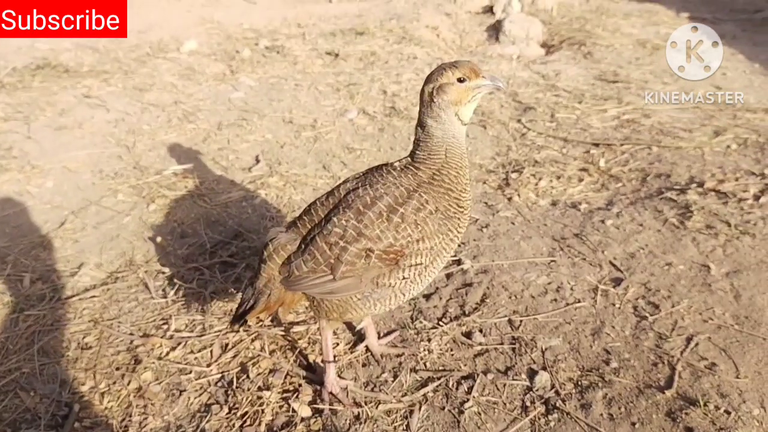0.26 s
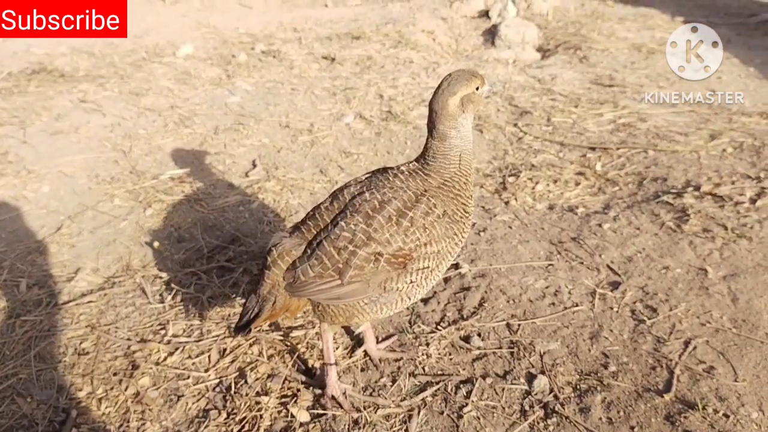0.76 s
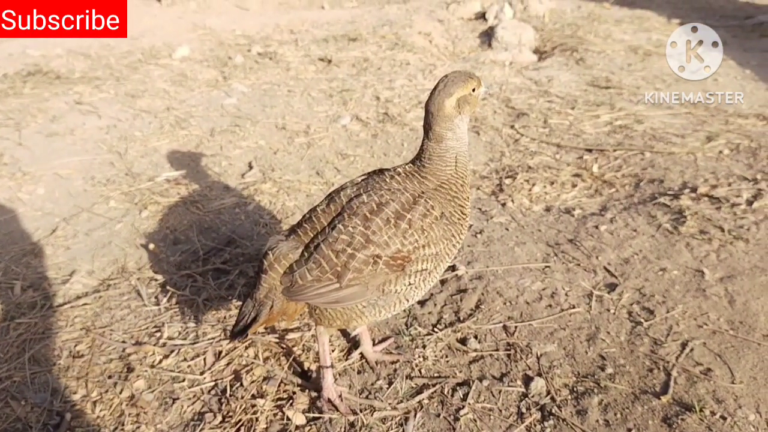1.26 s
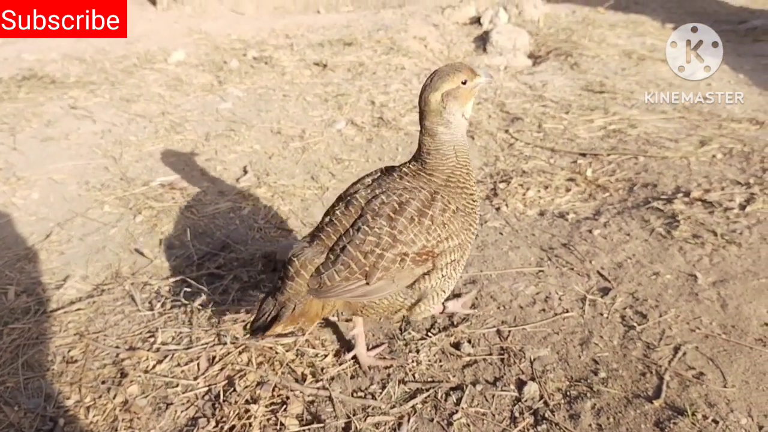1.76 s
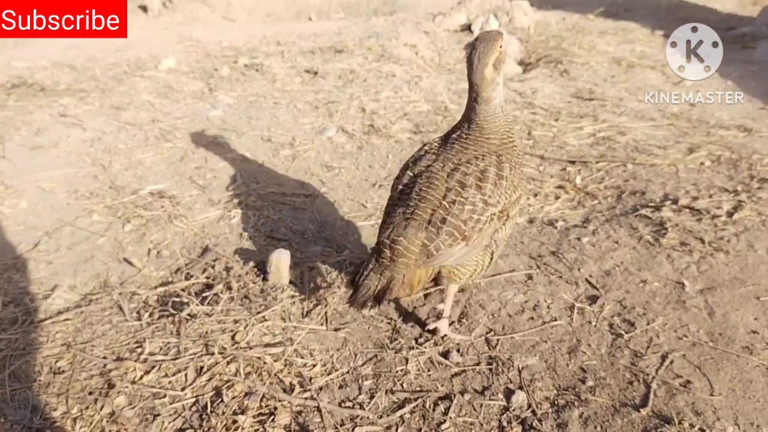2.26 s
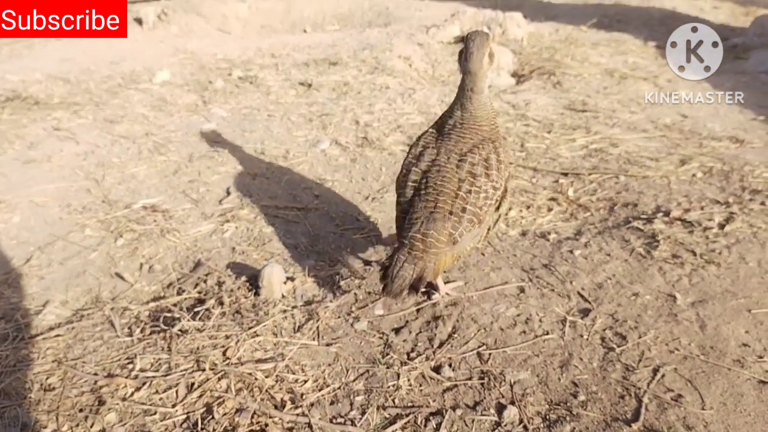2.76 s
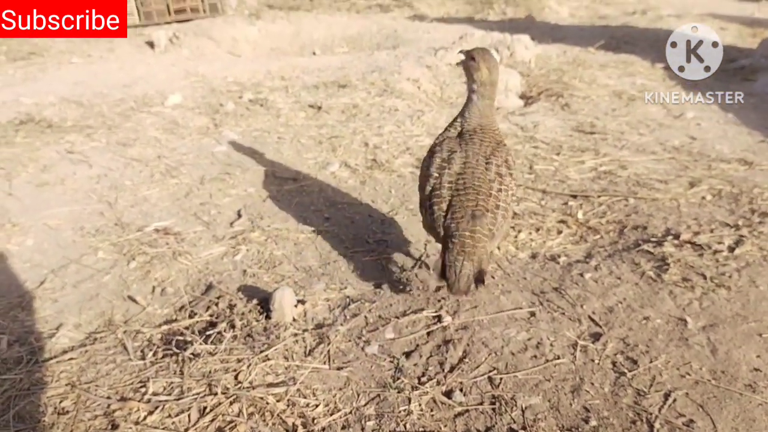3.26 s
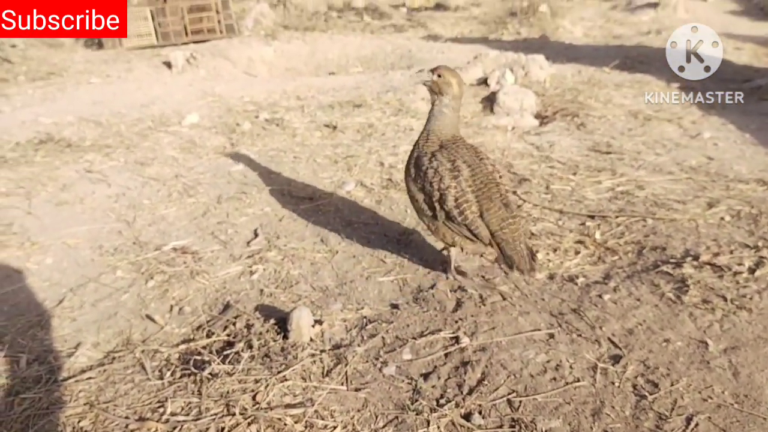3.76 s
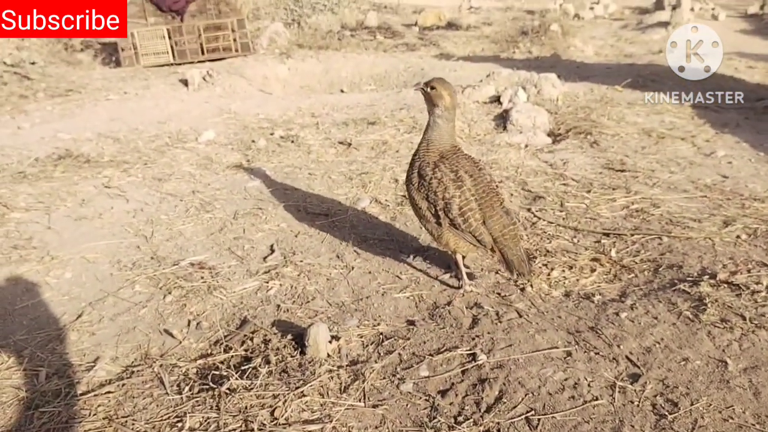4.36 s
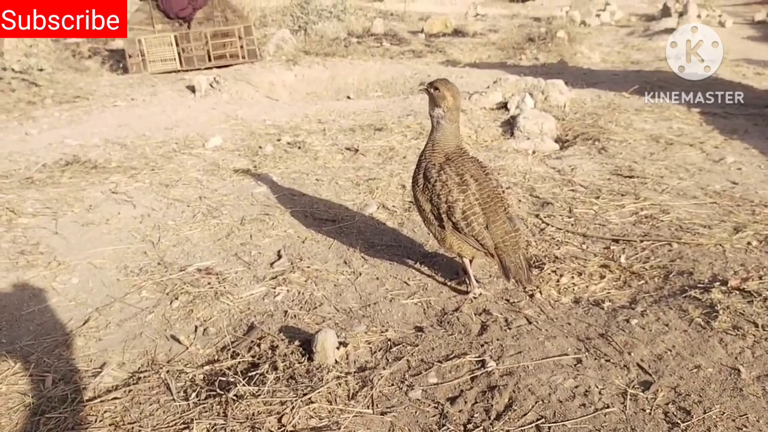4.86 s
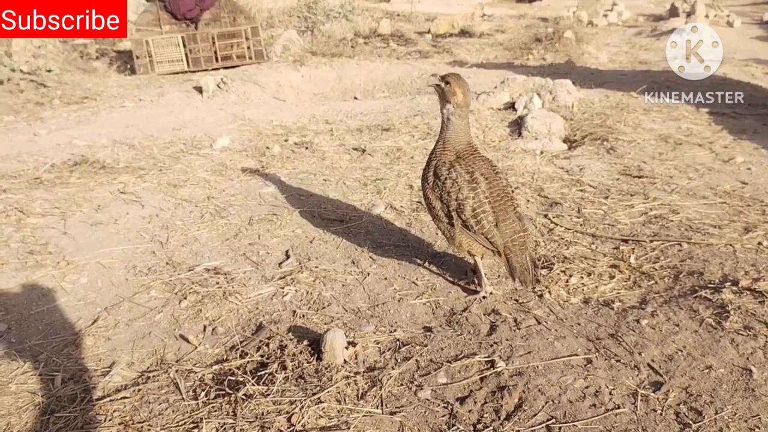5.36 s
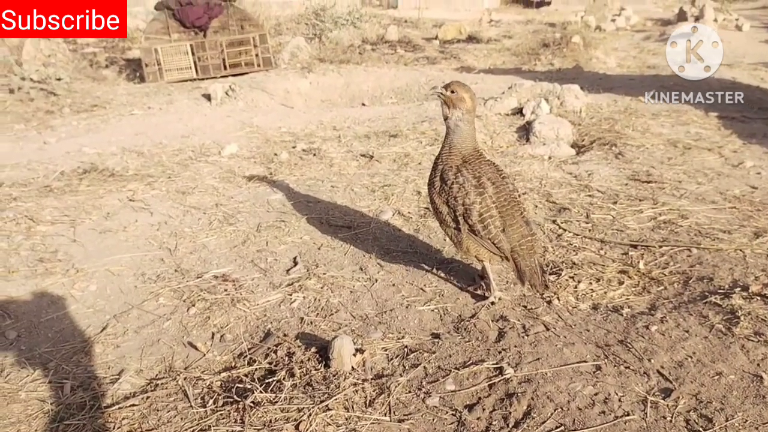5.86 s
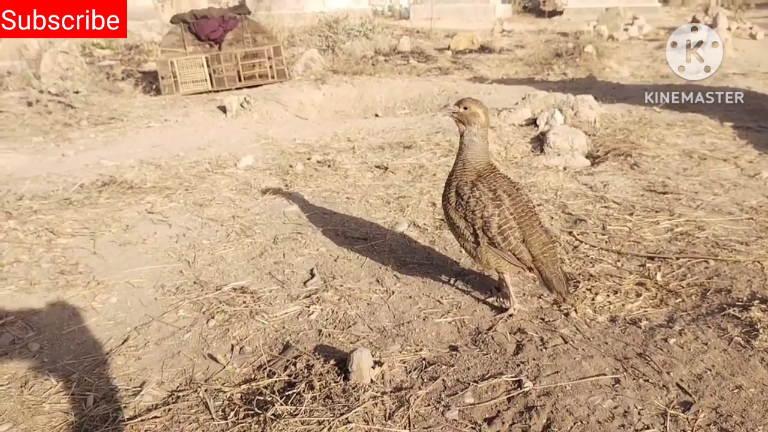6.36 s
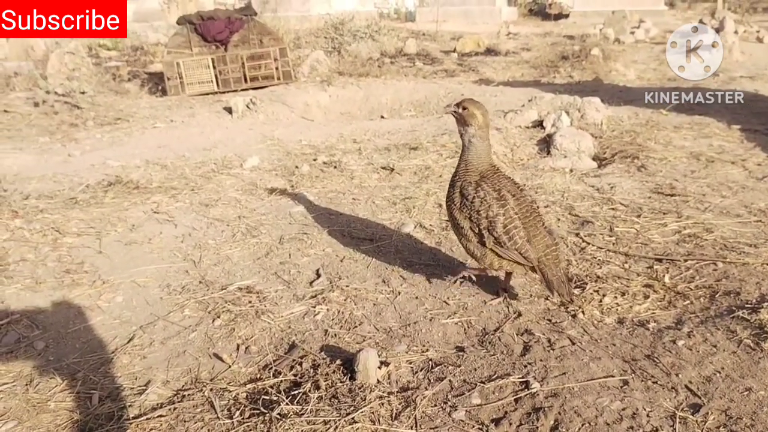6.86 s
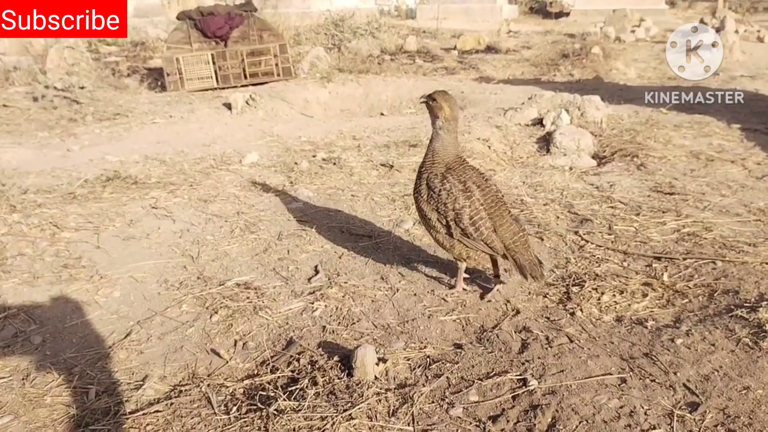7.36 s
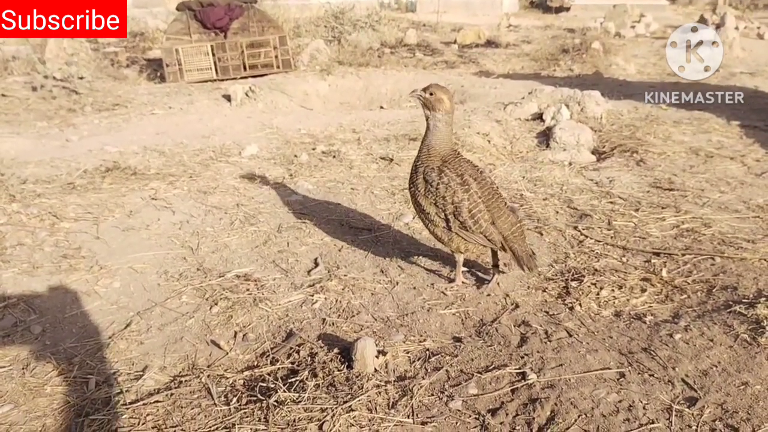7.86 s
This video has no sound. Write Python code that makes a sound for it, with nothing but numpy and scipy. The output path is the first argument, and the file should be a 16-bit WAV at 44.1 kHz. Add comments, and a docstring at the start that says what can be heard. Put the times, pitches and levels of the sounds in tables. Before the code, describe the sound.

At 0 s a nearby grey francolin lets out one abrupt raspy bark, falling in pitch and gone in under a tenth of a second. Until 1.7 s there is only soft low rumble, with tiny thin chirps around 0.3 to 0.9 s and blurred far-off bird calls. At 1.7 s the bird starts again and from 1.9 s settles into a loud, urgent run: rasping barks that often crack to a higher register, brief piercing whistles, and sharp falling slurs, repeating roughly every 0.6 s. From about 5 s the cycle stretches toward 0.7 s, pitch sags and slurs rattle more at their ends. The last whistle comes near 7.1 s, the last slur about 7.65 s, leaving low rumble and slight hiss to 8 s. The calls are dry and close, with rippling treble and a thin scattered echo; the background ducks beneath them.

```python
"""Dry open ground: a grey francolin repeats a harsh phrase in which barks and falling slurs mostly alternate.
Chaotic pulses ring throat and beak as a rasp, then harmonic tones lock in; some jump to a high register
and some notes lead into held whistles. The ground ripples the treble; rough walls return a smeared tail.
Behind: low rumble and a brighter hiss of filtered noise, faint sine chirps and noise-band calls of far birds.
Gain control pushes this background down while the francolin calls."""
import sys
import numpy as np
from scipy import signal
from scipy.fft import rfft, irfft, next_fast_len
from scipy.io import wavfile
from scipy.ndimage import uniform_filter1d, map_coordinates

SR = 44100
rng = np.random.default_rng(int(sys.argv[2]) if len(sys.argv) > 2 else 0)


def generate_wav(signal):
    """Clip the signal to [-1, 1] and save it as 16-bit WAV at the path in sys.argv[1]."""
    frames = np.transpose(np.atleast_2d(signal))
    scaled = np.clip(frames, -1, 1) * 32767
    pcm = np.round(scaled).astype(np.int16)
    wavfile.write(sys.argv[1], SR, pcm)


N = 357298
TIME = np.arange(N) / SR
CUTOFF_HZ = 15500


def from_db(db):
    """Decibels to amplitude gain."""
    return 10 ** (np.asarray(db) / 20)


def rms_one(x):
    """Scale to unit power."""
    return x / np.sqrt(np.mean(x ** 2) + 1e-20)


def evened(x, size=500):
    """Hold the power steady over a window of size samples, about 10 ms."""
    return x / np.sqrt(uniform_filter1d(x ** 2, size) + 1e-12)


def at_hz(points, hz, axis=1):
    """Read one column of a spectrum table on a log-frequency axis."""
    points = np.array(points)
    return np.interp(np.log(np.maximum(hz, 1)), np.log(points[:, 0]), points[:, axis])


def wander(size, rate_hz):
    """Gaussian values at rate_hz, joined by straight lines."""
    steps = np.arange(size) * rate_hz / SR
    return map_coordinates(rng.standard_normal(size), [steps], order=1, mode="wrap")


def band(x, low_hz, high_hz, order=2):
    """Butterworth band-pass."""
    edges = [low_hz, min(high_hz, .49 * SR)]
    return signal.sosfilt(signal.butter(order, edges, "band", fs=SR, output="sos"), x)


def resonate(x, modes):
    """Parallel two-pole resonances with alternating signs."""
    out = 0
    for k, (hz, width_hz, db) in enumerate(modes):
        r = np.exp(-np.pi * width_hz / SR)
        gain = (-1) ** k * from_db(db) * (1 - r * r) / 2
        poles = [1, -2 * r * np.cos(2 * np.pi * hz / SR), r * r]
        out = out + gain * signal.lfilter([1, 0, -1], poles, x)
    return out


def stretch(start, end, edge_s):
    """Samples of a note, its progress 0-1, and a gate with soft edges."""
    at = np.arange(max(0, int((start - edge_s) * SR)), min(N, int((end + edge_s) * SR)))
    inside = np.minimum(TIME[at] - start, end - TIME[at])
    progress = np.clip((TIME[at] - start) / (end - start), 0, 1)
    gate = .5 + .5 * np.sin(np.pi / 2 * np.clip(inside / edge_s, -1, 1))
    return at, progress, gate


def arch(pitches, progress):
    """A smooth polynomial pitch glide through evenly spaced points."""
    spots = np.linspace(0, 1, len(pitches))
    return np.polyval(np.polyfit(spots, pitches, len(pitches) - 1), progress)


# left-right likeness of the background noise: f/Hz, likeness/1 (below 0 counts as 0)
LIKENESS = [(60, 0.95), (180, 0.95), (550, 0.71), (1650, -0.45), (4970, -0.067), (15000, 0.13)]


def background_noise(spectrum):
    """Stereo noise of unit power: a shared mid and an opposed side, nearly alike in the bass."""
    size = next_fast_len(N, True)
    hz = np.fft.rfftfreq(size, 1 / SR)
    mid, side = rfft(rng.standard_normal((2, size))) * from_db(at_hz(spectrum, hz))
    alike = np.clip(at_hz(LIKENESS, hz), 0, 1)
    return rms_one(irfft(np.sqrt(1 + alike) * mid + np.sqrt(1 - alike) * side * [[1], [-1]])[:, :N])


# steady spectral shapes of the rumble and the brighter hiss: f/Hz, relative density/dB
RUMBLE_SPECTRUM = [(25, -28), (42, -26.5), (65, -9), (125, 1), (200, -5.5), (300, -12), (450, -29),
                   (700, -35), (1100, -41), (2000, -40.5), (3000, -46.5), (6200, -57.5), (10000, -62.5),
                   (15000, -78.5)]
BRIGHT_SPECTRUM = [(100, -21.5), (230, -11.5), (450, -3.5), (700, -7.5), (1000, -19.5), (1500, -29),
                   (1950, -16), (2700, -31.5), (5300, -38), (6300, -23), (7100, -40.5), (9000, -41.5),
                   (12000, -52)]
# mean background levels before gain control: t/s, rumble level/dB, bright hiss level/dB
BACKGROUND_LEVELS = [(0, -37, -80.5), (1.1, -39, -72), (1.702, -39, -58), (2.3, -40.5, -46.5),
                     (3.5, -35.5, -44.5), (4.5, -38, -45), (5.7, -41, -49), (6.3, -38.5, -43.5),
                     (8.1, -38, -50)]


def rumble_and_hiss(lump_db=1.37, bright_lump_db=2.5):
    """A lumpy low rumble, and a brighter hiss with low-mid body whose level rises, then varies."""
    s, rumble_db, bright_db = np.transpose(BACKGROUND_LEVELS)
    rumble_level_db = np.interp(TIME, s, rumble_db) + lump_db * wander(N, 8.1)
    bright_level_db = np.interp(TIME, s, bright_db) + bright_lump_db * wander(N, 2.648)
    low = background_noise(RUMBLE_SPECTRUM) * from_db(rumble_level_db)
    return low + background_noise(BRIGHT_SPECTRUM) * from_db(bright_level_db)


# far chirps before gain control: start t/s, end t/s, start f/Hz, middle f/Hz, end f/Hz, peak level/dB
CHIRPS = [(.26, .31, 3500, 3900, 4400, -77), (.34, .39, 4750, 4400, 3900, -75),
          (.67, .74, 4400, 5200, 4750, -74), (.88, .93, 4200, 4600, 4300, -79)]
# distance-blurred calls before gain control: start t/s, end t/s, centre f/Hz, level/dB
FAR_CALLS = [(0.282, 0.587, 1940, -66), (6.06, 6.155, 2900, -53), (1.0, 1.276, 1800, -66),
             (1.392, 1.583, 2400, -63.5), (6.744, 6.86, 1900, -51.5), (7.779, 8.055, 1930, -68)]


def small_birds(blur=0.15):
    """Thin gliding sine chirps, and farther calls that arrive as soft noise bands."""
    out = np.zeros((2, N))
    for start, end, *pitches, db in CHIRPS:
        at, progress, gate = stretch(start, end, .012)
        hz = arch(pitches, progress) * (1 + 0.012 * wander(len(at), 640))
        out[:, at] += from_db(db) * gate * np.sin(2 * np.pi * np.cumsum(hz) / SR)
    for start, end, hz, db in FAR_CALLS:
        at, _, gate = stretch(start, end, 0.089)
        call = band(rng.standard_normal((2, len(at))), hz * (1 - blur), hz * (1 + blur))
        out[:, at] += from_db(db) * gate * rms_one(call)
    return out


def background_gain(bird, threshold_db=-35, share=1.0, release_db_per_s=140, depth_db=20):
    """Gain control: the louder the bird, the further the background sinks; it recovers in the pauses."""
    power = uniform_filter1d(np.mean(bird ** 2, axis=0), size=256)
    level_db = 10 * np.log10(np.abs(power) + 1e-12)
    release_db = release_db_per_s * TIME
    held_db = np.maximum.accumulate(level_db + release_db) - release_db
    return from_db(-np.clip(share * (held_db - threshold_db), 0, depth_db))


def yard(voice, far_db=-25, far_t60_s=0.35, wall_s=0.067, spread_s=0.041, wall_db=-25):
    """A thin decaying tail from the surroundings and a bright, smeared return from rough walls."""
    t = TIME[:SR // 2]
    far, wall = rng.standard_normal((2, 2, len(t)))
    far = band(far * from_db(-60 * t / far_t60_s), 1600, 7000, order=1)
    wall = band(wall * np.exp(-.5 * ((t - wall_s) / spread_s) ** 2), 2000, 7200, order=4)
    wall = wall + from_db(5.5) * resonate(wall, [(2218, 95, 0)])
    response = (from_db(far_db) * rms_one(far) + from_db(wall_db) * rms_one(wall)) / np.sqrt(len(t))
    return signal.fftconvolve(voice[None], response, axes=1)[:, :N]


def ground(voice, bounce_db=-10, shift_s=0.00019, count=3):
    """Bounces off the ground ripple the treble; their paths shift as the bird and the microphone move."""
    treble = band(voice, 2600, 15000, order=2)
    out = np.zeros((2, N))
    for side in out:
        for delay_s in rng.uniform(.0005, .003, count):
            path_s = delay_s + shift_s * wander(N, 1.5)
            side += from_db(bounce_db) * np.interp(TIME - path_s, TIME, treble, left=0)
    return out


# voice at two microphone ports, before power levelling: f/Hz, left-right level/dB, left lead/rad
PORTS = [(780, -1.5, 0.73), (1342, 0.1, -0.59), (1590, -5, -0.82), (1850, 0.5, -1.9), (2350, -7.5, 2.2),
         (2500, 3.5, -0.22), (3380, 7, 1.5), (3985, 6, -0.31), (4700, 7.5, -0.58), (5300, 2.5, 1.8),
         (6800, 2, 1.6), (9500, -0.5, 1.3), (10500, 14, -0.29), (14000, 8, 0)]


def at_ports(voice):
    """The microphone body colours each side differently, in level and phase."""
    size = next_fast_len(N, True)
    hz = np.fft.rfftfreq(size, 1 / SR)
    side = np.array([[.5], [-.5]])
    gains = from_db(side * at_hz(PORTS, hz))
    gains = gains / np.sqrt(np.mean(gains ** 2, axis=0))
    turn = np.exp(1j * side * at_hz(PORTS, hz, axis=2))
    return irfft(rfft(voice, size) * gains * turn)[:, :N]


def chaos(pulse_hz, scatter, size_db, air):
    """The membranes slap at uneven intervals with uneven force, and air hisses through."""
    cycles = np.cumsum(pulse_hz * np.exp(scatter * wander(N, 800))) / SR
    slaps = np.diff(np.floor(cycles), prepend=0) * from_db(size_db * rng.standard_normal(N))
    return rms_one(slaps) + air * rng.standard_normal(N)


# rasp resonances before levelling: f/Hz, width/Hz, relative level/dB
THROAT = [(868.5, 49, -5.5), (1246, 224, 2.5), (1609, 536, 2)]
BEAK = [(2353, 73, 5.5), (3260, 540, -3.5), (4795, 530, 0.5), (7460, 950, -13.5), (8400, 1300, -21.5),
        (9660, 1200, -23.5), (11600, 1000, -33)]


def rasps(stretches, throat_db=0.0, beak_db=3.0, beak_lag_s=0.0027):
    """Chaotic pulses ring the throat and beak before a tone locks in and after it lets go."""
    pulses = chaos(pulse_hz=800, scatter=.17, size_db=4.0, air=.08)
    throat = evened(band(resonate(pulses, THROAT), 770, 1950, order=4), size=360)
    beak = evened(band(resonate(pulses, BEAK), 2350, 14500, order=4), size=360)
    beak = rms_one(band(beak, 1000, 4530, order=4) + from_db(-11.0) * beak)
    out = np.zeros(N)
    for start, end, low_db, high_db, slope_db in stretches:
        at, progress, gate = stretch(start, end, .002)
        # treble follows as the beak opens
        opening = 1 - np.exp(-np.maximum(TIME[at] - start + 0.00061, 0) / beak_lag_s)
        ringing = from_db(low_db + throat_db) * throat[at]
        ringing = ringing + from_db(high_db + beak_db) * opening * beak[at]
        out[at] += gate * from_db(slope_db * (progress - 1.11)) * ringing
    return out


def tones(notes, overtones, jitter, shimmer_db, flutter_db, edge_s, fray=0.015, count=10):
    """The syrinx locked on one pitch: a nearly steady oscillation whose upper harmonics flutter."""
    out = np.zeros(N)
    for start, end, pitches, levels, second_db in notes:
        at, progress, gate = stretch(start, end, edge_s)
        # least stable as it locks in and lets go
        unrest = 1 + 2 * (2 * progress - 1) ** 4
        # a slack syrinx, sagging in pitch, starts to rattle
        unrest += np.clip((1250 - arch(pitches, progress)) / 60, 0, 3)
        hz = arch(pitches, progress) * (1 + jitter * unrest * wander(len(at), 900))
        phase = 2 * np.pi * np.cumsum(hz) / SR
        wave = np.sin(phase) + from_db(second_db) * np.sin(2 * phase + rng.uniform(0, 2 * np.pi))
        for k in range(3, count + 1):
            db = at_hz(overtones, k * hz) + flutter_db * min(k / 6, 1) * wander(len(at), 110)
            # upper harmonics follow a strong second only in part
            db += second_db - 0.26 * max(second_db + 6.0, 0)
            smear = fray * k * wander(len(at), 1400)
            harmonic = np.sin(k * phase + smear + rng.uniform(0, 2 * np.pi))
            wave += from_db(db) * (k * hz < CUTOFF_HZ) * harmonic
        level_db = np.interp(progress, np.linspace(0, 1, len(levels)), levels)
        level_db = level_db + shimmer_db * unrest * wander(len(at), 1200)
        out[at] += np.sqrt(2) * from_db(level_db) * gate * wave
    return out


# held whistles: start t/s, mean f/Hz, mid-note fundamental level/dB, second harmonic re fundamental/dB
WHISTLES = [(1.928, 2201, -24, -2), (2.527, 2242, -17.5, -12), (3.128, 2258, -18.5, -7),
            (3.729, 2252, -18.5, -8), (4.352, 2249, -18.5, -8), (4.990, 2259, -19.5, -7),
            (5.635, 2248, -20.5, -8), (6.333, 2240, -17.5, -10), (7.096, 2227, -16.5, -13)]
WHISTLE_S, WHISTLE_SAG_HZ, WHISTLE_SWELL_DB = 0.071, 14, 2.5


def whistle_tones():
    """A whistle holds for a set time, sagging a little as it swells."""
    ramp = np.array([-.5, .5])
    notes = []
    for s, hz, db, second_db in WHISTLES:
        pitches, levels = hz - WHISTLE_SAG_HZ * ramp, db + WHISTLE_SWELL_DB * ramp
        notes.append((s, s + WHISTLE_S, pitches, levels, second_db))
    return notes


# rasp resonances into and out of a whistle, before levelling: f/Hz, width/Hz, relative level/dB
LEAD_IN = [(2380, 73, -0.5), (3170, 120, 0), (3640, 120, -5), (5100, 210, -14), (6350, 710, -13.5),
           (9100, 2000, -18.5), (12000, 2400, -43)]
RELEASE = [(2292, 73, -5), (3090, 96, -5), (4500, 230, -18), (6356, 89, -4), (8800, 600, -26.5),
           (11000, 630, -51), (12640, 600, -54.5)]


def whistle_rasps(lead_s=0.047, lead_db=-28, release_s=0.054, release_db=-26, fall_db=24):
    """The tightened syrinx scrapes on its way into a whistle and spits as it lets go."""
    scrape = chaos(pulse_hz=1230, scatter=.09, size_db=4.0, air=.1)
    spit = chaos(pulse_hz=1060, scatter=.16, size_db=4.0, air=.1)
    lead = evened(band(resonate(scrape, LEAD_IN), 2150, 9700, order=4))
    release = evened(band(resonate(spit, RELEASE), 1700, 13500, order=4))
    lead, release = (rms_one(band(x, 1200, 7200, order=4) + from_db(-16.5) * x) for x in (lead, release))
    out = np.zeros(N)
    for start, *_ in WHISTLES:
        end = start + WHISTLE_S
        at, _, gate = stretch(start - lead_s, start, 0.0038)
        out[at] += from_db(lead_db) * gate * lead[at]
        at, progress, gate = stretch(end, end + release_s, 0.0017)
        out[at] += from_db(release_db - fall_db * progress) * gate * release[at]
    return out


def whistle_ends(pitch_hz=1010, level_db=-44, fade_db=5, second_db=-4, before_db=-46):
    """Either side of a whistle the syrinx drops to a soft buzz whose third harmonic rings in the beak."""
    before, after = [], []
    for start, *_ in WHISTLES:
        end = start + WHISTLE_S
        before.append((start - .025, start, [pitch_hz, pitch_hz], [before_db, before_db], second_db))
        levels = [level_db, level_db - fade_db]
        after.append((end + .006, end + 0.032, [pitch_hz, .98 * pitch_hz], levels, second_db))
    overtones = [(3000, 12), (4000, 0), (6500, -2), (9000, -22)]
    return tones(before + after, overtones, jitter=.012, shimmer_db=1.0, flutter_db=3, edge_s=.008)


# slurs: low tone start t/s, low tone/s, high tone/s (0: none), start f/Hz, lowest f/Hz,
# peak level/dB, late level/dB, second harmonic re fundamental/dB, relative beak level/dB
SLURS = [(2.184, .021, .033, 1583, 1192, -9, -16, -20, -26),
         (2.468, .038, .015, 1548, 1128, -7.5, -21, -28.5, -27),
         (2.794, .023, .037, 1620, 1236, -7.5, -16, -19.5, -26),
         (3.077, 0.024, .031, 1604, 1240, -7.5, -19.5, -22.5, -26),
         (3.393, .031, .032, 1590, 1257, -8, -17.5, -24.5, -28.5),
         (3.680, .040, .020, 1573, 1180, -8, -24.5, -28.5, -25),
         (4.008, .036, .028, 1587, 1188, -9, -20.5, -27, -26.5),
         (4.325, .040, .020, 1560, 1190, -9.5, -22, -31, -22),
         (4.650, 0.031, .032, 1572, 1243, -8.5, -19, -24.5, -30),
         (4.935, .083, 0, 1575, 1184, -9, -22, -23, -29.5),
         (5.26, .039, .028, 1547, 1206, -9.5, -20, -28.5, -29.5),
         (5.556, .089, 0, 1560, 1125, -9.5, -22.5, -29, -32),
         (5.886, 0.088, 0, 1541, 1099, -10.5, -20.5, -25.5, -31.5),
         (6.262, .084, 0, 1457, 920, -12.5, -28, -32.5, -37),
         (6.613, .099, 0, 1526, 1034, -10, -23.5, -30, -36),
         (6.975, .084, 0, 1480, 921, -16.5, -26.5, -31, -37.5),
         (7.333, 0.093, 0, 1525, 1177, -9, -20, -25.5, -41),
         (7.648, .088, 0, 1474, 1073, -11.5, -25, -26, -30.5)]
SLUR_SAG_HZ_PER_S, SLUR_REBOUND_HZ_PER_S = 10000, 1500
SLUR_ATTACK_S, SLUR_SWELL_DB, SLUR_FADE_DB_PER_S = .018, 7, 619
SLUR_RASP_LEAD_S, SLUR_RASP_LAP_S, SLUR_RASP_DB, SLUR_RASP_SWELL_DB = 0.012, 0.0062, -20, 9
RATTLE_AFTER_S, RATTLE_THROAT_DB, RATTLE_BEAK_DB = .044, -31, -51.5
RATTLE_RELEASE_S, RATTLE_RELEASE_DB = .012, 9
# high tone: the later it comes, the lower
FLIP_HZ, FLIP_SAG_HZ_PER_S, FLIP_SCOOP_HZ, FLIP_DROOP_HZ = 2049, 9500, 21, 135
FLIP_DB, FLIP_SWELL_DB, FLIP_SECOND_DB = -27, 4.5, 14
# short low tone that ends a flipped slur
DROP_S, DROP_GLIDE_HZ, DROP_SWELL_DB, DROP_FADE_DB, DROP_SECOND_DB = .017, 92.5, 3.5, 11.5, -24


def slur_parts(count=6, size=24):
    """A brief rasp and a falling tone that rattles on low, or flips to the high register and drops back."""
    low, high, rough = [], [], []
    for start, low_s, high_s, hz, lowest_hz, peak_db, late_db, second_db, beak_db in SLURS:
        end = start + low_s
        # past its lowest pitch it creeps up again
        past_lowest = np.linspace(0, low_s, count) - (hz - lowest_hz) / SLUR_SAG_HZ_PER_S
        climb_hz = np.maximum(-SLUR_SAG_HZ_PER_S * past_lowest, SLUR_REBOUND_HZ_PER_S * past_lowest)
        pitches = lowest_hz + climb_hz
        t = np.linspace(0, low_s, size)
        past_peak = t - SLUR_ATTACK_S
        swell = peak_db + SLUR_SWELL_DB * past_peak / SLUR_ATTACK_S
        fade = np.maximum(peak_db - SLUR_FADE_DB_PER_S * past_peak, late_db)
        levels = np.where(past_peak < 0, swell, fade)
        rasp_start, rasp_end = start - SLUR_RASP_LEAD_S, start + SLUR_RASP_LAP_S
        rough.append((rasp_start, rasp_end, SLUR_RASP_DB, beak_db, SLUR_RASP_SWELL_DB))
        if high_s > .01:
            drop, crest = end + high_s, FLIP_HZ - FLIP_SAG_HZ_PER_S * low_s
            flip_pitches = [crest - FLIP_SCOOP_HZ, crest, crest - FLIP_DROOP_HZ]
            high.append((end, drop, flip_pitches, [FLIP_DB, FLIP_DB + FLIP_SWELL_DB], second_db + FLIP_SECOND_DB))
            drop_pitches = [lowest_hz + DROP_GLIDE_HZ, lowest_hz - DROP_GLIDE_HZ]
            drop_levels = [late_db - DROP_SWELL_DB, late_db, late_db - DROP_FADE_DB / 6, late_db - DROP_FADE_DB]
            low.append((drop, drop + DROP_S, drop_pitches, drop_levels, DROP_SECOND_DB))
        else:
            levels = levels - RATTLE_RELEASE_DB * np.clip(1 - (low_s - t) / RATTLE_RELEASE_S, 0, 1)
            rattle_end = end - RATTLE_RELEASE_S
            rough.append((start + RATTLE_AFTER_S, rattle_end, RATTLE_THROAT_DB, RATTLE_BEAK_DB, 0))
        low.append((start, end, pitches, levels, second_db))
    return low, high, rough


# barks: start t/s, rasp/s, low tone/s, high tone/s (0: none), low tone f/Hz, low tone sag/Hz, peak level/dB,
# late level/dB, second harmonic re fundamental/dB, relative throat level/dB, relative beak level/dB
BARKS = [(0.0, .023, .044, 0, 1373, 302.5, -12, -22, -27.5, -24, -42.5),
         (1.724, .021, .052, 0, 1399, 303, -11, -21.5, -23, -20, -38),
         (2.047, .028, .018, 0.037, 1711, -2, -10, -13, -13, -19.5, -19),
         (2.362, .029, 0.041, 0, 1637, 241.5, -17, -26, -4.5, -16.5, -24),
         (2.664, 0.029, 0.0078, 0.038, 1662, 5, -14.5, -16.5, -13, -17.5, -23.5),
         (2.971, 0.027, .014, 0.023, 1628, 1.5, -11.5, -19.5, -10, -17, -24.5),
         (3.270, .025, .010, .040, 1673, -3, -11, -20, -10, -18.5, -26),
         (3.570, .023, 0.0081, 0.035, 1610, -5, -9.5, -22.5, -12, -18, -29),
         (3.882, 0.03, 0.0092, .040, 1637, -4, -11, -18, -18, -20, -24),
         (4.208, .026, .014, .035, 1593, -8, -11.5, -20, -15, -19, -29),
         (4.523, .024, .010, .042, 1614, 3, -16.5, -17.5, -15, -19.5, -26.5),
         (4.833, 0.031, 0.014, .021, 1550, -9, -9.5, -23, -16.5, -19.5, -31),
         (5.135, 0.028, .008, .042, 1607, -8, -19, -16.5, -19.5, -19, -27),
         (5.452, .023, 0.01, .034, 1584, 1, -11.5, -20.5, -17, -20.5, -32),
         (5.766, 0.03, 0.015, .030, 1539, -8.5, -12, -19.5, -17, -21, -28),
         (6.151, 0.031, 0.058, 0, 1460, 116.5, -9.5, -21.5, -20.5, -23, -30),
         (6.486, .028, 0.018, .034, 1532, -2.5, -12, -20.5, -15.5, -20, -28),
         (6.867, .033, .057, 0, 1454, 144, -10.5, -22.5, -25, -22, -35),
         (7.202, .025, 0.0034, .045, 1588, 0, -23, -17.5, -15, -20, -26),
         (7.543, 0.025, 0.042, 0, 1514, 90, -13, -22.5, -17.5, -20.5, -32.5)]
# high tone: pitch ratio to the low tone, start and end below its crest
BARK_JUMP, BARK_SCOOP_HZ, BARK_DROOP_HZ = 1.255, 53.3, 125
BARK_SWELL_DB, BARK_HIGH_SECOND_DB = 1.5, 9.5
OVERLAP_S, RASP_SWELL_DB = 0.0011, 4
CLOSE_S, CLOSE_THROAT_DB, CLOSE_BEAK_DB, CLOSE_FADE_DB = .013, -4, -13, 4.5


def bark_parts():
    """A rasp swells into a low tone, mostly followed by a jump to the high register and a closing rasp."""
    low, high, rough = [], [], []
    for start, rasp_s, low_s, high_s, hz, sag_hz, peak_db, late_db, second_db, throat_db, beak_db in BARKS:
        lock = start + rasp_s
        jump = end = lock + low_s
        levels = [peak_db - BARK_SWELL_DB, peak_db, peak_db + (late_db - peak_db) / 6, late_db]
        low.append((lock, jump, [hz, hz - sag_hz / 4, hz - sag_hz], levels, second_db))
        if high_s > .01:
            end, crest = jump + high_s, BARK_JUMP * hz
            pitches = [crest - BARK_SCOOP_HZ, crest, crest - BARK_DROOP_HZ]
            high.append((jump, end, pitches, [late_db, late_db], second_db + BARK_HIGH_SECOND_DB))
        rough.append((start, lock + OVERLAP_S, throat_db, beak_db, RASP_SWELL_DB))
        # a note that has sagged is too slack to rasp again
        if sag_hz < 100:
            close_throat_db, close_beak_db = throat_db + CLOSE_THROAT_DB, beak_db + CLOSE_BEAK_DB
            rough.append((end, end + CLOSE_S, close_throat_db, close_beak_db, -CLOSE_FADE_DB))
    return low, high, rough


# harmonics from the third, re second before its partial coupling: f/Hz, level/dB
LOW_OVERTONES = [(3000, -13.5), (4000, -5), (5200, -16), (6500, -27.5), (8500, -30), (11000, -41.5),
                 (14000, -61)]
HIGH_OVERTONES = [(5000, -6.5), (6200, -30.5), (8000, -34.5), (10000, -31.5), (12000, -47), (14000, -56.5)]
WHISTLE_OVERTONES = [(6700, -6), (9000, -18.5), (11200, -31), (13500, -36.5), (15500, -53.5)]


def francolin(hiss_db=-38):
    """Low and high registers, whistles and the rasps between them, heard in the open."""
    low_notes, high_notes, rough = (barks + slurs for barks, slurs in zip(bark_parts(), slur_parts()))
    low = tones(low_notes, LOW_OVERTONES, jitter=0.0043, shimmer_db=0.45, flutter_db=6.5,
                edge_s=0.0036, fray=.13)
    high = from_db(-0.25) * tones(high_notes, HIGH_OVERTONES, jitter=0.0024, shimmer_db=0.7,
                                  flutter_db=10.0, edge_s=0.0015)
    high += tones(whistle_tones(), WHISTLE_OVERTONES, jitter=.0012, shimmer_db=0.18,
                  flutter_db=4.0, edge_s=0.0026)
    # air hisses in step with the oscillation, most through the tightened syrinx
    hiss = from_db(hiss_db) * band((high + 0.57 * low) * rng.standard_normal(N), 2500, 11000)
    voice = low + high + hiss + rasps(rough) + whistle_rasps() + whistle_ends()
    return at_ports(voice + ground(voice)) + yard(voice)


def scene():
    """The francolin in front of the ducked background."""
    bird = francolin()
    return bird + background_gain(bird) * (rumble_and_hiss() + small_birds())


def record(dry):
    """A steep elliptic low-pass cuts the top."""
    return signal.sosfilt(signal.ellip(10, .1, 80, CUTOFF_HZ, fs=SR, output="sos"), dry)


dry = scene()
out = record(dry)
generate_wav(out)
```